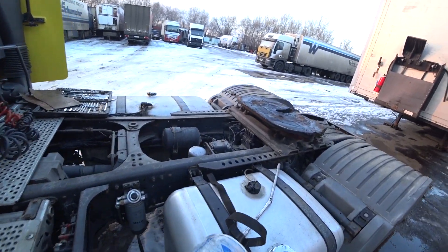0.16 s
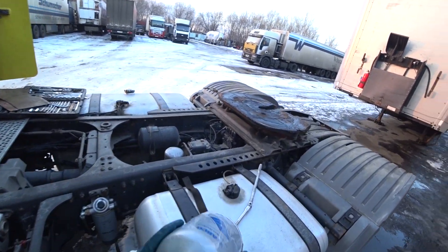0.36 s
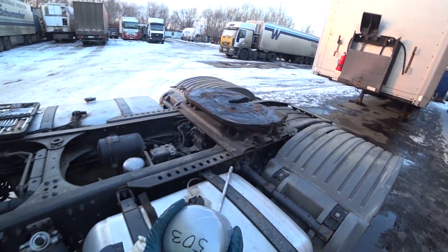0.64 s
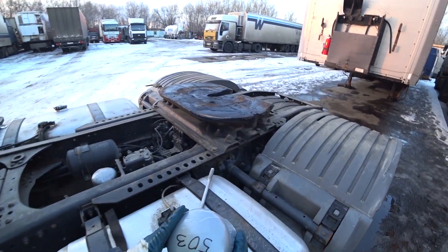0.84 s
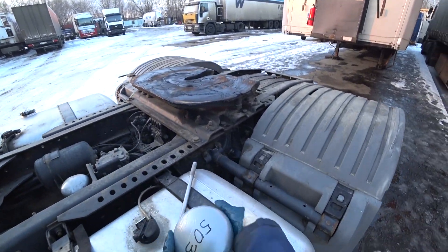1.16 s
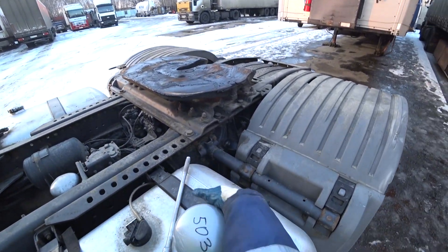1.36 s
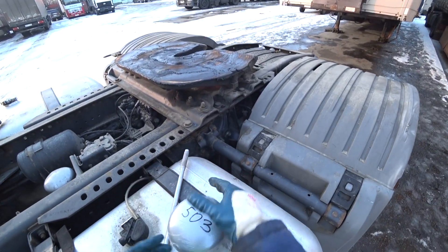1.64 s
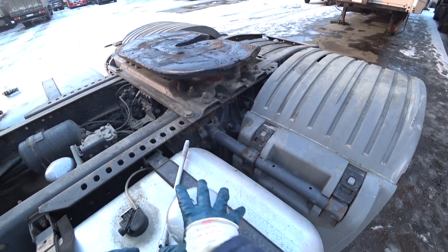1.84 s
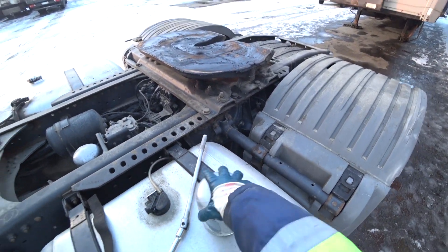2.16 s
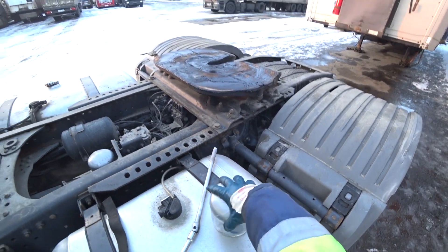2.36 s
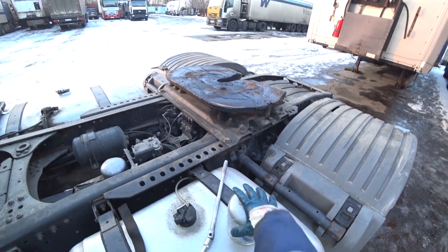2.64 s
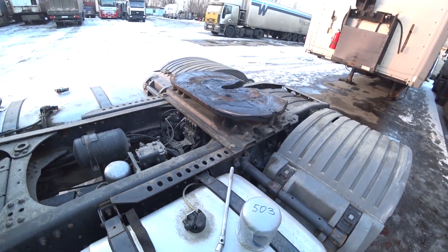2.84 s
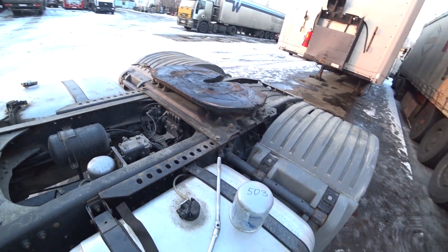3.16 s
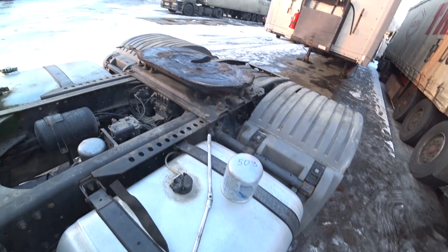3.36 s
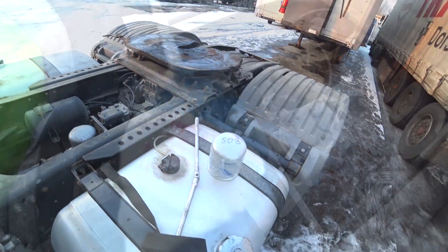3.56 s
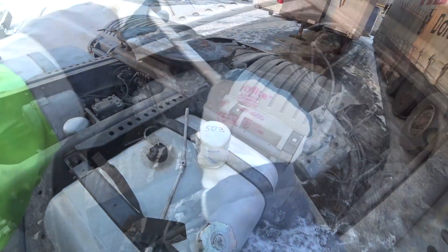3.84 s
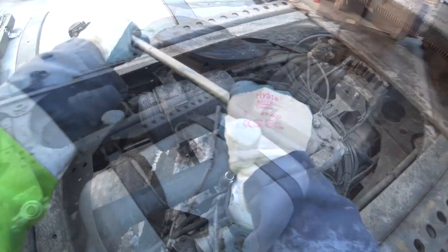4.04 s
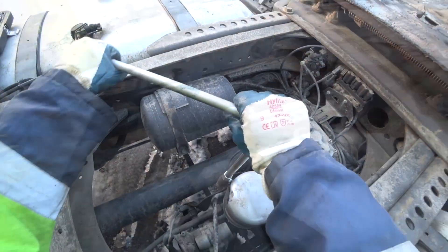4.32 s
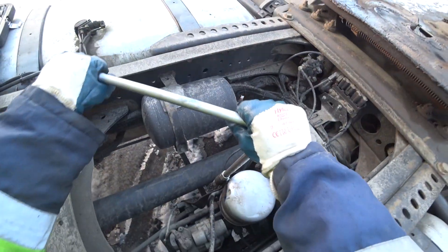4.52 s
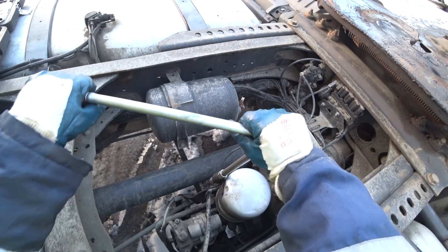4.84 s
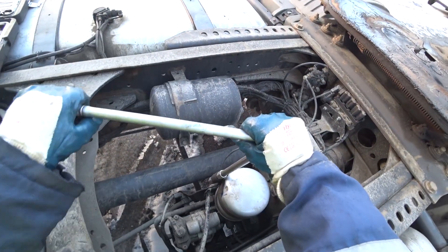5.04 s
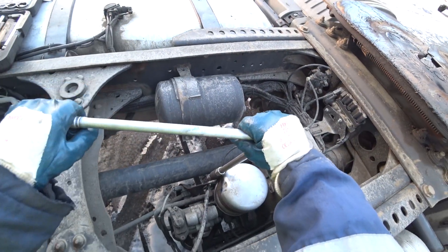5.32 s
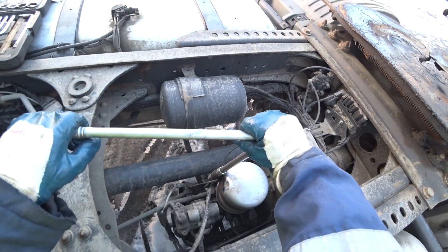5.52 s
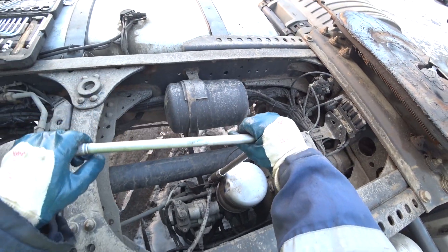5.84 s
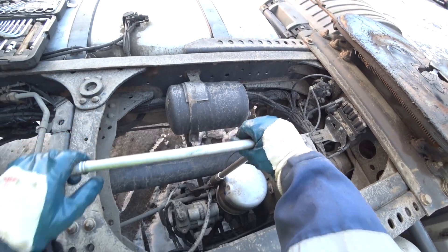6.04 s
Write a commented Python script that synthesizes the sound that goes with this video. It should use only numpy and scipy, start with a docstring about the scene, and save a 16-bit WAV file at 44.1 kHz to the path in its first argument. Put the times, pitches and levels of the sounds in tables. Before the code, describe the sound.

Outdoors in a truck yard, heard through a body-worn camera, pressurised air escapes in a strong bright hiss that drifts as the wearer moves. About a second and a half in, a metal can lands on an aluminium fuel tank with a quick rattle of hollow clonks, then gets a softer nudge. Light scuffs and ticks follow, and near four seconds the hiss dissolves into a quieter, duller, steadier one.

```python
"""Truck air hiss and a can on a fuel tank

Compressed air hisses from a truck's brake system: filtered noise plus shifting echoes off the chassis.
A metal filter can is set down on the aluminium fuel tank, rocks and is nudged: damped tones and thuds.
Boots, sleeves and gloves scuff (rough noise), small ticks sound, and a lorry park murmurs faintly.
Near 4 s the sound dissolves to a second spot over the frame, where the hiss is weaker and duller.
All is heard through the two ports of a body-worn camera."""
import sys
import numpy as np
from scipy import signal
from scipy.fft import rfft, irfft, next_fast_len
from scipy.io import wavfile
from scipy.ndimage import map_coordinates

SR = 44100
rng = np.random.default_rng(int(sys.argv[2]) if len(sys.argv) > 2 else 0)


def int16_out(signal):
    """Quantize to a 16-bit WAV file."""
    q = np.round(np.clip(np.atleast_2d(signal).T, -1, 1) * 32767)
    wavfile.write(sys.argv[1], SR, q.astype(np.int16))


N = 272538

TOP_HZ = 15850  # nothing above this pitch is kept
# The fade from the first spot to the second. It holds: start in seconds, end in seconds.
DISSOLVE = (3.97, 4.486)


def amp(db):
    """Turn decibels into a gain."""
    return 10 ** (np.asarray(db) / 20)


def unit(x):
    """Scale x to an rms (average strength) of 1."""
    return x / np.sqrt(np.mean(x ** 2) + 1e-20)


def along(points, hz):
    """Read a curve of (Hz, value) points, with pitch on a log axis."""
    f, v = np.transpose(points)
    return np.interp(np.log(hz + 1), np.log(f + 1), v)


def curves(rows):
    """Give one value per sample for each column after the time."""
    s, *cols = np.transpose(rows)
    return [np.interp(np.arange(N) / SR, s, c) for c in cols]


def wobble(rate):
    """Draw a smooth random curve with `rate` random points a second."""
    coarse = np.arange(0, N + 256, 256)
    points = rng.standard_normal(256)
    curve = map_coordinates(points, [coarse * rate / SR], mode="mirror")
    return np.interp(np.arange(N), coarse, curve)


def filtered(x, response):
    """Weigh each frequency of x by response(hz)."""
    n = x.shape[-1]
    m = next_fast_len(n + 4096, True)
    spectrum = rfft(x, m) * response(np.fft.rfftfreq(m, 1 / SR))
    return irfft(spectrum, m)[..., :n]


def band(hz, low_hz, high_hz, order=2):
    """Gain of a band-pass with soft edges; a higher order makes them steeper."""
    below = 1 + (low_hz / (hz + 1)) ** (2 * order)
    above = 1 + (hz / high_hz) ** (2 * order)
    return (below * above) ** -.5


def glancing(spread, sway, shimmer, echo_db, count):
    """Jet noise plus reflections off steel; head movement shifts each path, so the comb ripples drift.

    spread and sway are in seconds; shimmer is the rate at which echoes come and go, per second."""
    reflects_from_hz = 1140  # longer waves pass round the steel parts
    jet = rng.standard_normal(N)
    fine = signal.resample_poly(jet, up=4, down=1)  # finer time steps for smoothly moving delays
    paths, power = np.zeros(N), np.zeros(N)
    for k in range(count):
        delay = spread * (k + 2 + rng.random()) / count + sway * wobble(1.2)
        index = np.round((np.arange(N) - delay * SR) * 4).astype(int)
        strength = wobble(shimmer) * np.exp(-k / count)
        paths += strength * fine.take(index, mode="wrap")
        power += strength ** 2
    steady_paths = paths / np.sqrt(power)  # the reflected share stays constant
    echoes = filtered(steady_paths, lambda hz: band(hz, reflects_from_hz, SR))
    return unit(jet + amp(echo_db) * echoes)


def air(jet, colour, resonances):
    """Colour the jet for both ports and add a diffuse part that differs between them."""
    # How alike the two ports sound. Each row: frequency in Hz, likeness from 0 to 1.
    likeness = [(100, .97), (1000, .94), (2000, .9), (5000, .89), (8000, .82), (12000, .68)]

    def turn(hz):
        return np.arccos(np.clip(along(likeness, hz), 0, 1)) / 2

    def gain(hz):
        lift_db = sum(db / (1 + (2 * (hz - centre) / width) ** 2) for centre, width, db in resonances)
        return amp(along(colour, hz) + lift_db) * [np.cos(turn(hz)), np.sin(turn(hz))]

    pair = np.array([jet, rng.standard_normal(N)])
    shared, diffuse = filtered(pair, gain)
    return unit(np.array([shared + diffuse, shared - diffuse]))


def surging(jet, depth_db):
    """Narrow ranges of the hiss swell and sink at random."""
    width_hz, length_s = 453.4, .14  # spacing of the random points
    hz, t, z = signal.stft(jet, SR, nperseg=512)
    places = np.meshgrid(hz / width_hz, t / length_s, indexing="ij")
    field = map_coordinates(rng.standard_normal((128, 128)), places, mode="mirror")
    return signal.istft(z * amp(depth_db * field), SR, nperseg=512)[1][:, :N]


def crested(jet, crest_hz):
    """The brightest part of the hiss slides up and down as the camera turns."""
    lift_db, width_hz = 4, 580
    hz, t, z = signal.stft(jet, SR, nperseg=512)
    offset = (hz[:, None] - np.interp(t * SR, np.arange(N), crest_hz)) / width_hz
    lift = amp(lift_db / (1 + (2 * offset) ** 2))
    return signal.istft(z * lift, SR, nperseg=512)[1][:, :N]


def open_hiss():
    """Beside the tank: long waves bend round the body; turning and shadowing weigh the higher ranges."""
    # Colour of the escaping air. Each row: frequency in Hz, level in dB per Hz.
    jet_colour = [(100, -54), (250, -30.5), (450, -23), (750, -18), (1200, -14), (1650, -13), (2100, -4.5),
                  (3700, -0.5), (4900, -4.5), (6900, -2), (8000, -3.5), (9400, -12), (12300, -10),
                  (15500, -14)]
    # Narrow resonances of the air outlet. Each row: frequency in Hz, width in Hz, lift in dB.
    outlet = [(2370, 340, 1.5), (3570, 110, 1), (15450, 150, 4)]
    # How the jet reaches the camera as its wearer turns and leans over the tank, before the trims below.
    # Each row: time in seconds, hiss level in dB, crest of the hiss in Hz, rush level in dB.
    exposure = [(0.0, -23, 6750, -28.5), (0.36, -24.5, 6900, -25.5), (0.44, -24, 6650, -29),
                (0.57, -22, 6350, -29.5), (0.67, -24.5, 7100, -26.5), (0.82, -25.5, 7150, -29.5),
                (1.3, -30, 7200, -30), (1.65, -29, 7050, -30.5), (1.75, -28.5, 7300, -30.5),
                (2.1, -27.5, 7200, -33), (2.23, -29, 7000, -29.5), (2.8, -26, 7140, -31.5),
                (3.0, -28, 7040, -28.5), (3.45, -26, 7340, -30.5), (3.6, -25.7, 6850, -30.3),
                (3.82, -26, 7200, -29.5), (3.9, -27, 6800, -27.5), (4.05, -26.5, 6800, -30)]
    # Treble above about 9 kHz, before its trim and the fade. Each row: time in seconds, level in dB.
    treble = [(0, -27), (0.25, -32), (0.45, -30), (1.0, -31.5), (1.58, -35), (1.8, -33.5), (2.1, -33),
              (2.45, -31.5), (2.95, -33.5), (3.5, -32.5), (3.9, -33), (4.3, -30)]
    rush_trim_db, hiss_trim_db, fizz_trim_db = -1.5, 1, -1  # added to the levels in the tables
    roar_db = -40.0

    hiss_db, crest_hz, rush_db = curves(exposure)
    treble_db, = curves(treble)
    glance = glancing(spread=.009, sway=0.000238, shimmer=4.48, echo_db=-3.0, count=24)
    jet = air(glance, jet_colour, outlet)
    jet = surging(crested(jet, crest_hz), depth_db=0.95)

    def part(low_hz, high_hz):
        return unit(filtered(jet, lambda hz: band(hz, low_hz, high_hz, order=10)))

    roar = amp(roar_db) * part(50, 1813)
    rush = amp(rush_db + rush_trim_db + 0.23 * wobble(9.37)) * part(2037, 4230)
    hiss = amp(hiss_db + hiss_trim_db + 0.42 * wobble(18)) * part(4715, 8110)
    fizz = amp(treble_db + fizz_trim_db + 1.0 * wobble(22.02)) * part(8820, SR / 2)
    leaving = np.interp(np.arange(N) / SR, DISSOLVE, [1, 0])
    return (roar + rush + hiss + fizz) * leaving * amp(0.16 * wobble(24))


def yard():
    """The faint low murmur of the lorry park: noise that partly differs on each side."""
    # Colour of the murmur. Each row: frequency in Hz, level in dB per Hz.
    yard_colour = [(20, -11), (60, -9.5), (130, -5.5), (300, -3), (700, -4.5), (2000, -42)]
    noise = rng.standard_normal(N) + .5 * rng.standard_normal((2, N))
    murmur = unit(filtered(noise, lambda hz: amp(along(yard_colour, hz))))
    return murmur * amp(-65 + 0.77 * wobble(10))


def air_swell_and_scuffs():
    """A low swell of the air hiss, then dull scuffs: uneven grains over smooth noise that swell and fade."""
    # Scuffs of boots, sleeves and gloves; the first row is a low swell of the air hiss.
    # Each row: time of the peak in seconds, spread in seconds, level in dB, centre in Hz.
    swells = [(0.345, 0.12, -37, 1510), (3.129, 0.008, -42, 740), (3.168, 0.0087, -51, 180),
              (3.232, 0.015, -52, 260), (3.62, 0.013, -48.5, 171), (3.881, 0.069, -43.5, 376),
              (3.895, 0.047, -42.5, 880), (5.493, 0.034, -41, 1080), (5.61, 0.074, -47, 590)]
    width_octaves, narrowing = 0.44, 0.28  # width at 1 kHz; power by which higher ones are narrower
    # in a scuff the grains are small slips, and the smooth noise is the sliding between them
    grains_per_s, smooth_db = 450, -1.5
    out, t = np.zeros(N + SR), np.arange(-SR // 4, SR // 4) / SR
    for s, spread, db, centre_hz in swells:
        octaves = width_octaves * (1000 / centre_hz) ** narrowing
        chosen = rng.random(len(t)) < grains_per_s / SR
        grains = unit(rng.standard_normal(len(t)) * chosen)
        rough = grains + amp(smooth_db) * rng.standard_normal(len(t))
        tinted = filtered(rough, lambda hz: np.exp(-.5 * (np.log2((hz + 1) / centre_hz) / octaves) ** 2))
        envelope = np.exp(-.5 * (t / spread) ** 2)
        out[round((s + t[0]) * SR):][:len(t)] += amp(db) * unit(tinted) * envelope
    return out[:N]


def knocks():
    """Each contact of can and tank gives a low push and a short thud and rings both metal bodies.

    Its spot favours one range; soft contacts lose the treble, those on the rim the bass."""
    # The can touches the tank; landing flat reaches deeper than landing on the rim.
    # Each row: start in seconds, strength in dB, lowest frequency in Hz, favoured frequency in Hz.
    contacts = [(1.454, -16.5, 139, 338), (1.461, -18.5, 170, 270), (1.474, -26, 350, 740),
                (1.49, -23.5, 180, 300), (1.514, -19.5, 170, 460), (1.547, -18, 80, 280),
                (1.556, -18, 380, 640), (1.574, -24, 120, 230), (1.593, -23, 130, 900),
                (1.601, -18, 328, 636), (1.626, -24, 248, 650), (1.66, -31, 350, 650),
                (1.719, -30, 140, 250), (1.728, -26, 320, 480), (1.754, -28.5, 251.4, 500),
                (2.379, -37, 110, 170), (2.3863, -21.5, 403, 1050), (2.395, -26.5, 130, 240),
                (2.403, -26, 600, 850), (2.437, -38, 300, 450), (2.45, -40, 220, 400),
                (2.521, -40, 200, 260), (2.547, -41, 202, 270)]
    # Ring of the fuel tank's shell. Each row: frequency in Hz, relative level in dB,
    # time to fall by 60 dB in seconds (before the glove's damping).
    tank = [(118, -21, .8), (141, -10, 1.6), (162, -13, .35), (204, -17, 1.9), (222, -5, .5),
            (254, -.5, .33), (294, -14, 2.6), (372, -9, .3), (397, -8.5, 1.45), (428, -8, .3),
            (455, -5, .35), (487, -6, .5), (510, -11, .55), (586, -14, .35), (632, -2.5, .36),
            (651, -2.5, .35), (692, -8, .3), (721, -7, .3), (748, -12, .3), (793, -10, .35),
            (930, -14, .25), (965, -16, .2), (1125, -11, .25), (1696, -10, .14)]
    # The can's own hollow, quickly damped ring.
    # Each row: frequency in Hz, level in dB, time to fall by 60 dB in seconds.
    hollow_can = [(256, -6, 0.092), (467.4, -7.5, 0.088), (742, -9.5, 0.1), (955, -11, 0.074),
                  (1151, -16.5, 0.088)]
    # Colour of the thud. Each row: frequency in Hz, level in dB per Hz.
    thud_colour = [(30, -36), (90, -33), (150, -2.5), (260, 1.5), (330, -6.5), (450, 0), (560, -7),
                   (700, -4.5), (1000, -14.5), (1400, -16.5), (1900, -15), (2600, -21), (3700, -19),
                   (9000, -30)]
    # Fading of the thud, before the glove's damping.
    # Each row: frequency in Hz, time to fall by 60 dB in seconds.
    thud_t60 = [(100, 0.1), (600, 0.067), (1500, 0.15), (6000, 0.024)]
    # A harder blow is shorter, so brighter: its upper edge, and the drop in strength that halves the edge.
    firm_db, firm_edge_hz, db_per_octave = -19.5, 3000, 14
    spot_lift_db, spot_octaves = 6, 0.2  # the struck spot favours one range
    thud_db, ring_base_db = -0.7, -15.5
    # Later the glove presses the can down: ring loss in dB, extra damping of ring and thud in dB per second.
    pressed_from_s, pressed_loss_db, ring_damp, thud_damp = 2.0, 2.5, 56, 450
    push_db, push_s = -28, 0.0016  # the can's weight pushes the tank's top down once; rise time
    same_sign_below_hz = 410

    out, t = np.zeros(N + 2 * SR), np.arange(SR) / SR
    mode_hz, mode_db, t60 = np.transpose(tank)
    shell_fade = amp(mode_db[:, None] - 60 * t / t60[:, None])
    shell = shell_fade * np.sin(2 * np.pi * mode_hz[:, None] * t)
    can = np.array([amp(db - 60 * t / fall) * np.sin(2 * np.pi * hz * t) for hz, db, fall in hollow_can])
    push = amp(push_db) * t / push_s * np.exp(1 - t / push_s)

    for s, db, low_hz, spot_hz in contacts:
        edge_hz = firm_edge_hz * 2 ** ((db - firm_db) / db_per_octave)
        high_hz = np.clip(edge_hz, 2 * low_hz, TOP_HZ)
        pressed = s > pressed_from_s

        def spot_db(hz):
            return spot_lift_db * np.exp(-.5 * (np.log2((hz + 1) / spot_hz) / spot_octaves) ** 2)

        # every contact drives the broad, low modes the same way
        signs = np.where(mode_hz < same_sign_below_hz, 1, rng.choice([-1, 1], len(tank)))
        strengths = signs * amp(spot_db(mode_hz) + rng.normal(0, 1.8, len(tank)))
        ring_db = ring_base_db - (pressed_loss_db + ring_damp * t) * pressed
        ring = amp(ring_db) * (strengths @ shell)

        noise = unit(filtered(rng.standard_normal(SR), lambda hz: amp(along(thud_colour, hz))))
        hz, age, z = signal.stft(noise, SR, nperseg=256)
        fade_db = -60 * age / along(thud_t60, hz)[:, None] - thud_damp * age * pressed
        thud = signal.istft(z * amp(spot_db(hz)[:, None] + fade_db), SR, nperseg=256)[1][:SR]

        clonk = rng.choice([-1, 1], len(hollow_can)) @ can
        contact = signal.butter(2, [low_hz, high_hz], "band", fs=SR, output="sos")
        blow = signal.sosfilt(contact, push + clonk + amp(thud_db) * thud + ring)
        out[round(s * SR):][:SR] += amp(db) * blow
    return out[:N]


def rim_clicks():
    """The can's steel rim strikes edge-on: a few high tones ring together and die quickly."""
    # Tones of the rim. Each row: frequency in Hz, relative level in dB, time to fall by 60 dB in seconds.
    rim = [(3520, -1, 0.033), (3770, -2, .035), (3900, -3.5, 0.027)]
    # Clicks of the rim on the tank. Each row: start in seconds, strength in dB.
    clicks = [(1.455, -23), (1.554, -21), (1.597, -19.5)]
    out, t = np.zeros(N), np.arange(SR // 10) / SR
    for s, db in clicks:
        ring = np.zeros(len(t))
        for hz, level_db, t60 in rim:
            tone = np.sin(2 * np.pi * hz * t + rng.uniform(0, 2 * np.pi))
            ring += tone * amp(level_db - 60 * t / t60)
        out[round(s * SR):][:len(t)] += amp(db) * ring
    return out


def ticks():
    """Light, dry contacts: a sudden noise burst in one broad resonance, gone at once."""
    # Small ticks of handling. Each row: start in seconds, level in dB, centre in Hz,
    # time for the burst to fall by 60 dB in seconds.
    dry_ticks = [(3.849, -32, 900, .015), (3.894, -22, 1100, .012), (3.934, -28, 1500, .008)]
    out, t = np.zeros(N), np.arange(SR // 10) / SR
    for s, db, centre_hz, t60 in dry_ticks:
        b, a = signal.iirpeak(centre_hz, 0.67, fs=SR)  # a low Q makes the resonance broad

        def resonate(x):
            return signal.lfilter(b, a, signal.lfilter(b, a, x))

        noise = rng.standard_normal(len(t))
        burst = noise * amp(db - 60 * t / t60)
        out[round(s * SR):][:len(t)] += resonate(burst) / resonate(noise).std()
    return out


def shielded_hiss():
    """Over the frame: the chassis screens the jet; the stiller head holds the ripples nearly in place."""
    # Colour of the screened air. Each row: frequency in Hz, level in dB per Hz.
    shielded_colour = [(100, -60), (250, -20.5), (520, -9.5), (700, -9), (950, -7), (1800, -8.5),
                       (3300, -3.5), (5000, -8.5), (7000, -3.5), (8300, -8), (9400, -16), (12500, -14),
                       (15500, -20.5)]
    # Narrow resonances of the air over the frame. Each row: frequency in Hz, width in Hz, lift in dB.
    frame_gap = [(2250, 120, 1.2), (3250, 100, 0.81), (5840, 460, 2.2), (6870, 240, 5.8), (7500, 190, 2.6)]
    glance = glancing(spread=.011, sway=.00008, shimmer=2.42, echo_db=-4.0, count=24)
    jet = air(glance, shielded_colour, frame_gap)
    arriving = np.interp(np.arange(N) / SR, DISSOLVE, [0, 1])
    return surging(jet, depth_db=0.06) * arriving * amp(-35.5 + 0.2 * wobble(14))


def scene():
    """Add both hisses, the air swell, the handling sounds and the yard."""
    hisses = open_hiss() + shielded_hiss()
    contacts = knocks() + rim_clicks() + ticks()
    return hisses + air_swell_and_scuffs() + contacts + yard()


def ports(hz):
    """The camera's two ports differ in phase and in level, the level most of all around 700 Hz."""
    # Level between the ports. Each row: frequency in Hz, left minus right in dB.
    port_level = [(60, -7), (200, -2.5), (400, -9.5), (700, -15), (1000, -10), (2200, -5.5), (4800, -3),
                  (10000, -3.5), (12800, -5.5), (15500, -3.5)]
    # Phase between the ports. Each row: frequency in Hz, lead of the left port in radians.
    port_phase = [(100, -.25), (350, -.15), (530, .15), (760, 1.7), (1050, 2.1), (3000, 1.85), (5700, 1.4),
                  (12500, 1.35), (15500, 1)]
    half = amp(along(port_level, hz) / 2) * np.exp(.5j * along(port_phase, hz))
    pair = np.array([half, 1 / half])
    return pair / np.abs(pair.mean(axis=0))  # the average of both ports keeps its level


def record(dry):
    """Apply the ports' colour, then cut everything above the camera's band limit."""
    return filtered(dry, lambda hz: ports(hz) * (hz < TOP_HZ))


dry = scene()
out = record(dry)
int16_out(out)
```